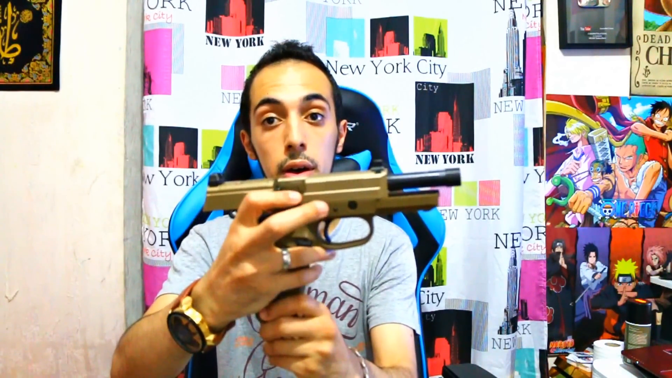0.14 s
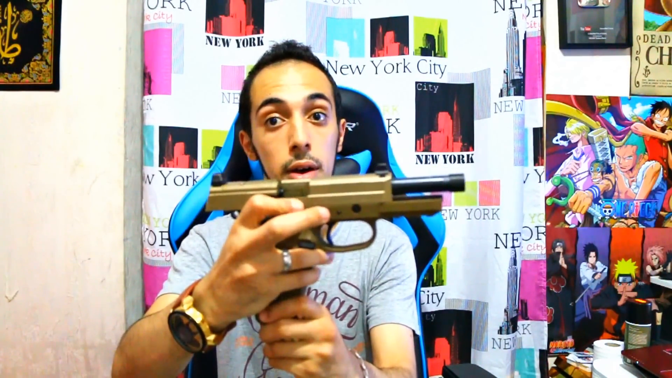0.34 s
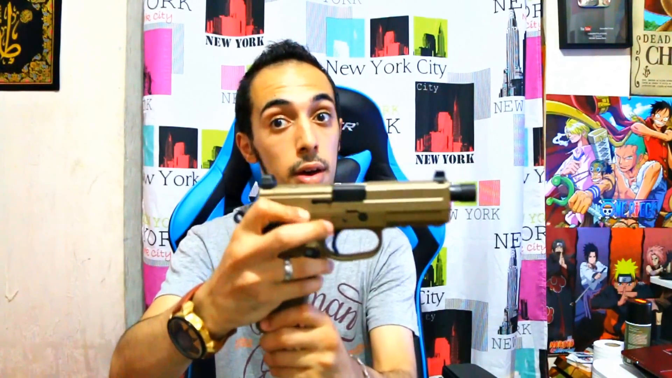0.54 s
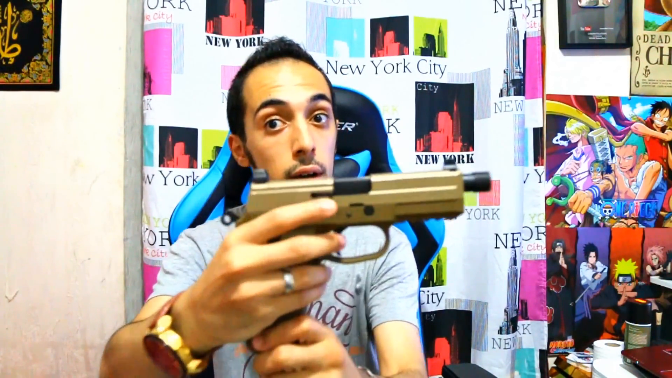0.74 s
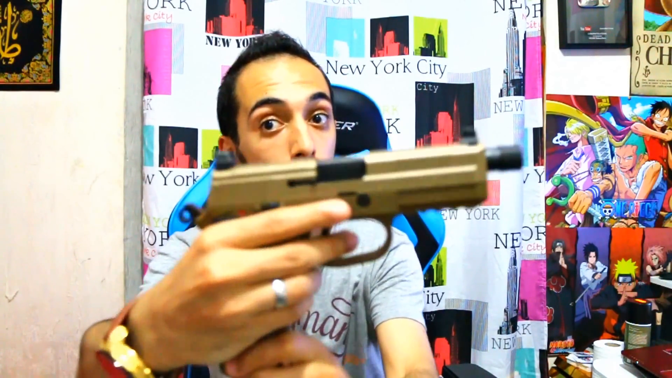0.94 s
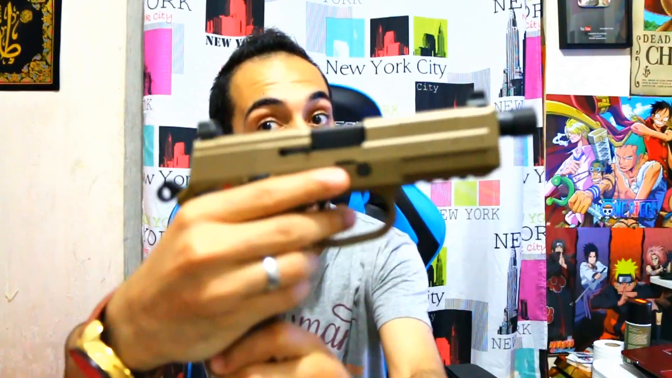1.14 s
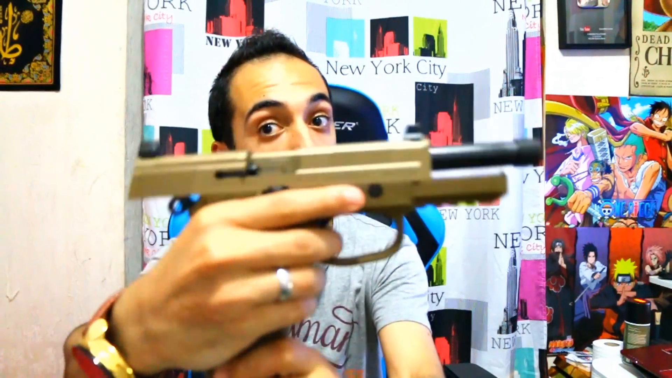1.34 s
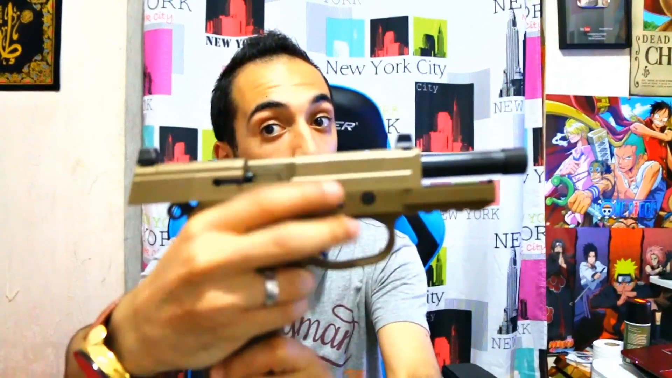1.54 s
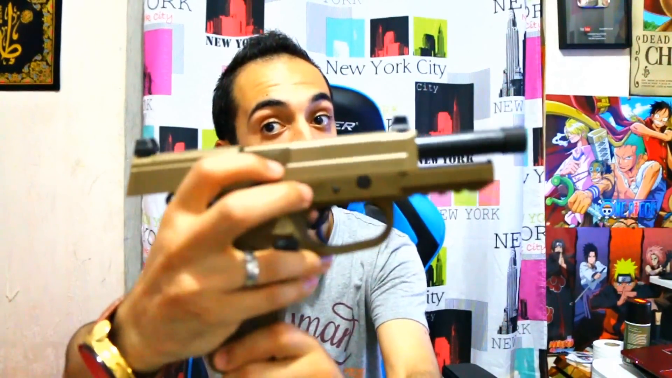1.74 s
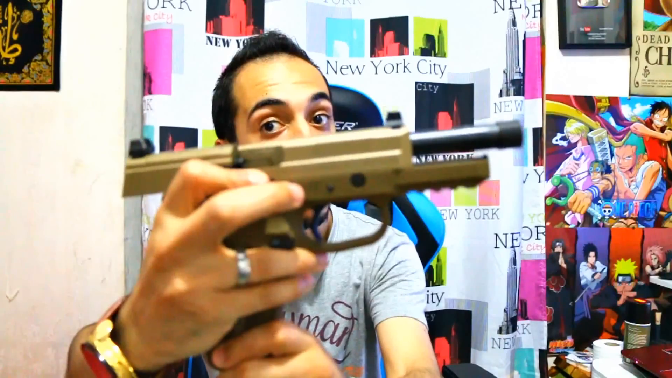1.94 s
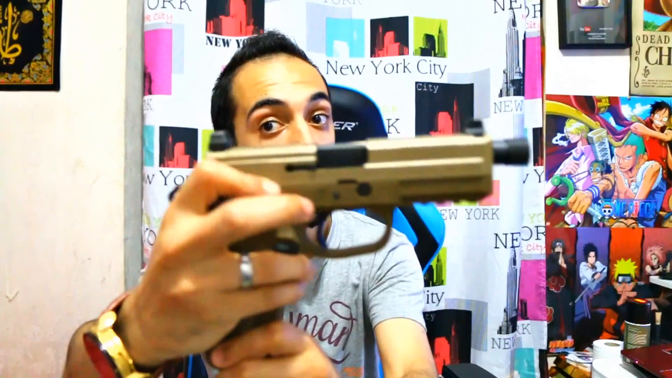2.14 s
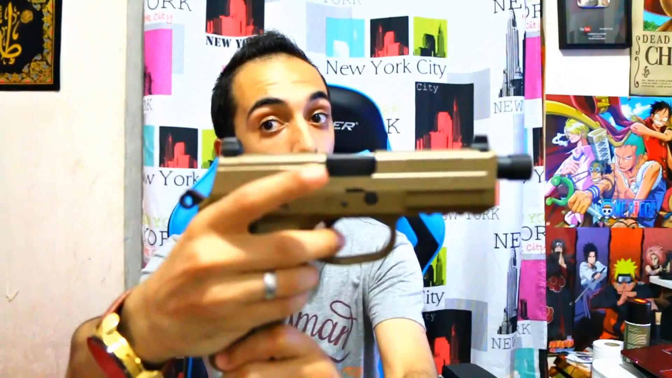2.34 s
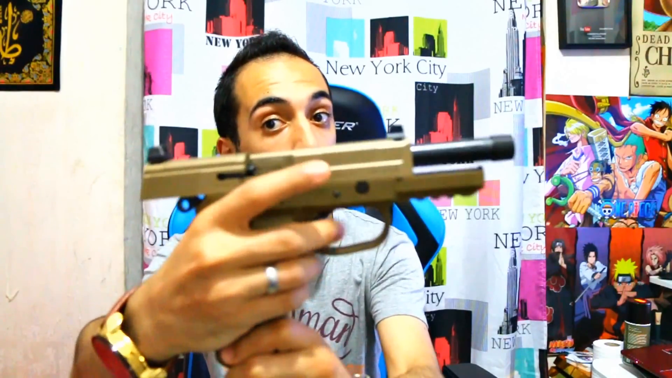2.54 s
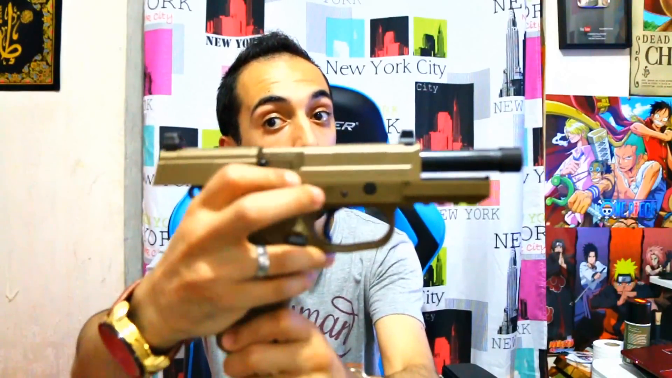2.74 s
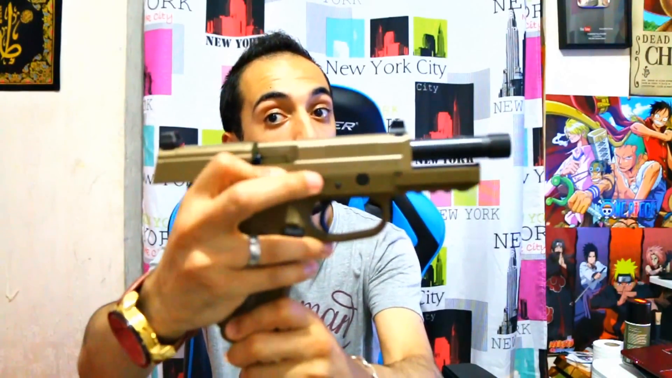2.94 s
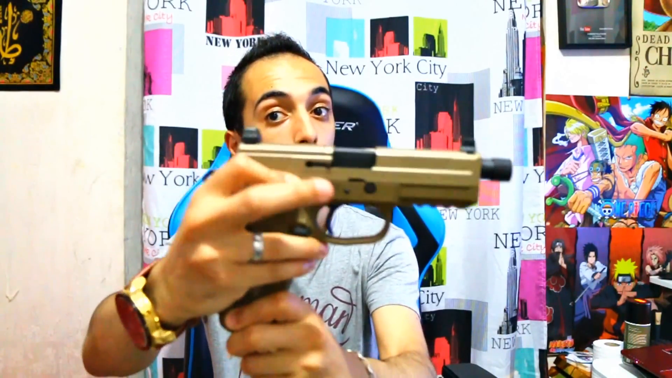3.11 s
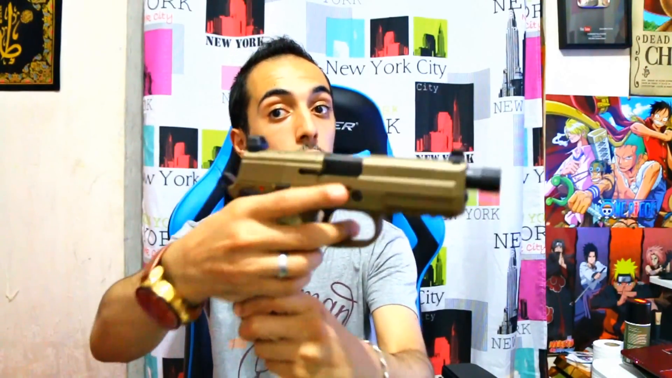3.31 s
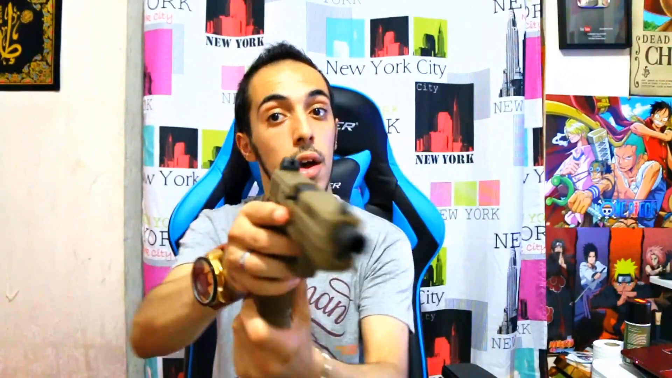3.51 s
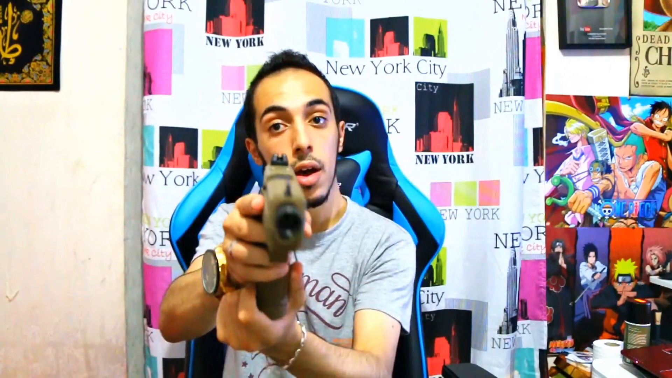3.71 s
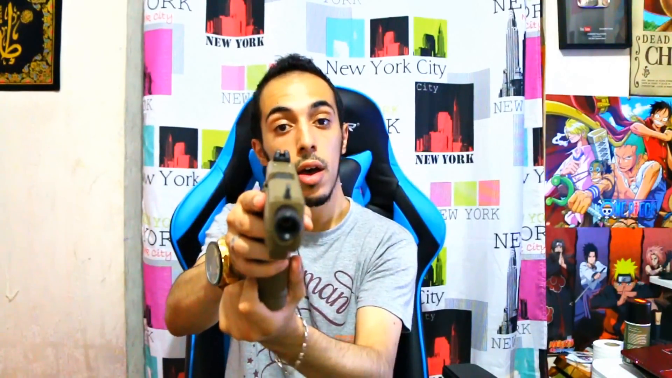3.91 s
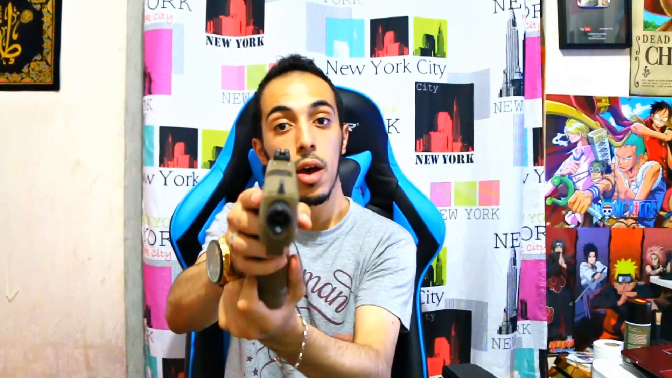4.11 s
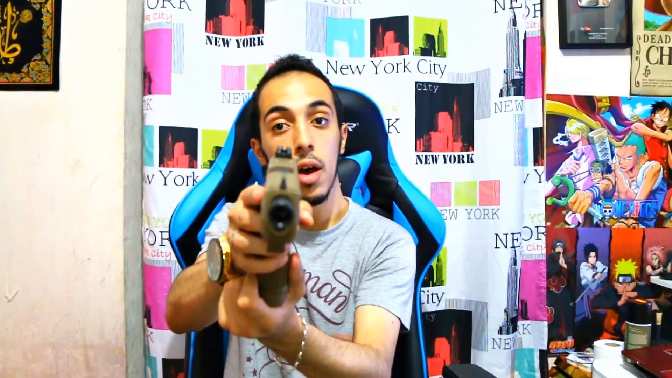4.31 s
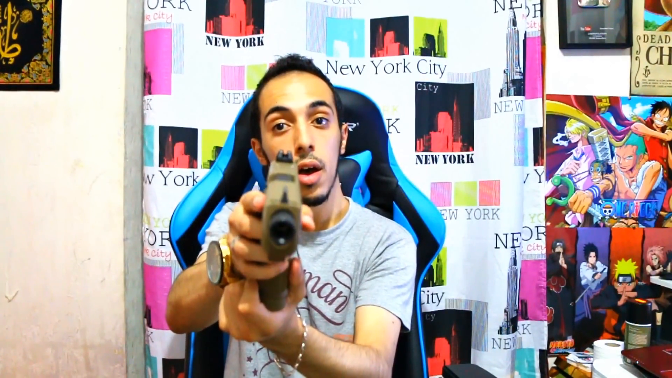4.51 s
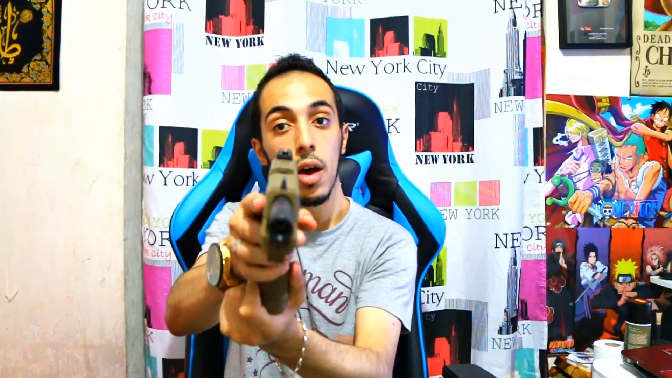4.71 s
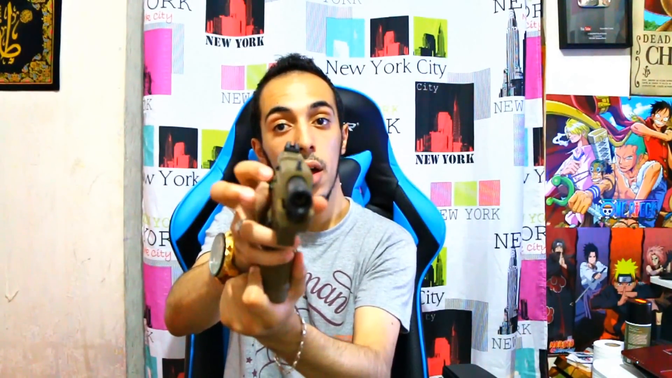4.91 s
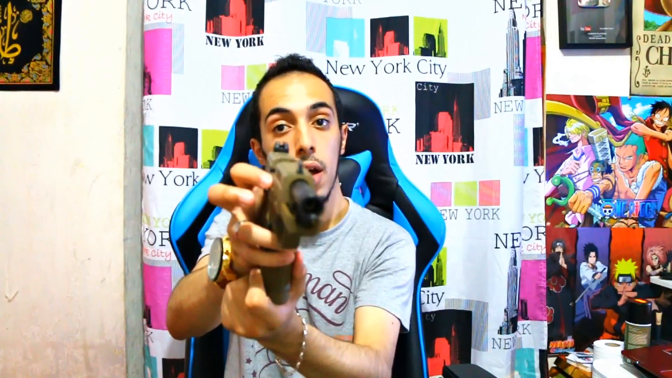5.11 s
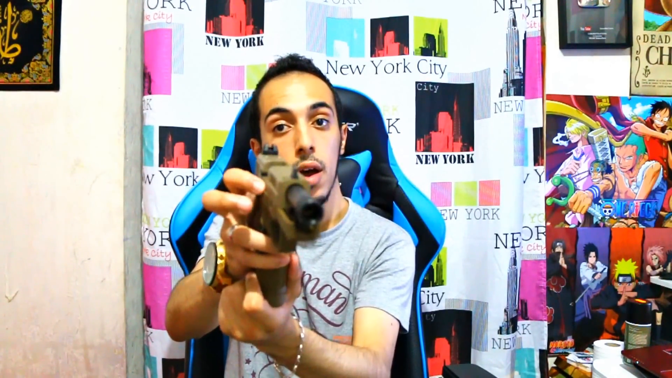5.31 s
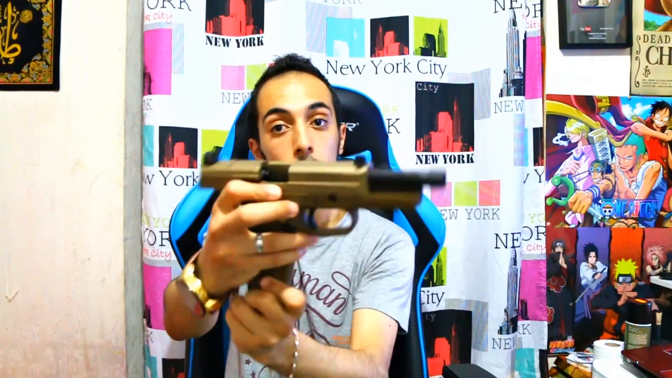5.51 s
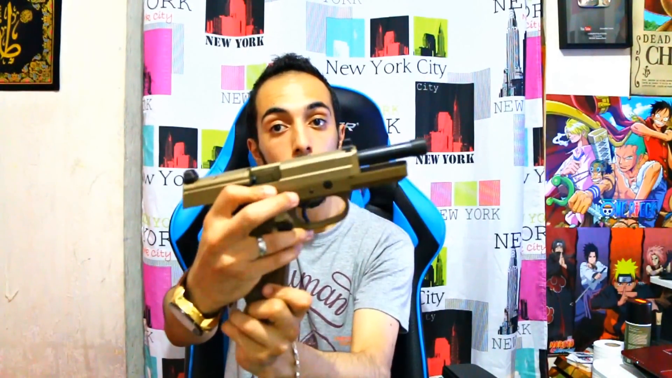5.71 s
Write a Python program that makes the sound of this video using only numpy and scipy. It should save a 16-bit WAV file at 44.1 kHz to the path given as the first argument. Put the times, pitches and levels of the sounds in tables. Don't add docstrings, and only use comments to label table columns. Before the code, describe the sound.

Close to a small microphone in a furnished room, a gas pistol's slide rattles forward and slams shut with a bright metallic crack. A trigger clicks and a rough gas burst overloads the recording. Slam and shot repeat, then a third, softer slam. Quiet finger ticks, rubbing and a low desk knock follow, before one last loud shot and faint handling. Steady faint mains hum and hiss lie underneath.

```python
import sys
import numpy as np
from scipy import signal
from scipy.fft import rfft, irfft
from scipy.io import wavfile
from scipy.ndimage import uniform_filter1d

SR = 44100
rng = np.random.default_rng(int(sys.argv[2]) if len(sys.argv) > 2 else 0)


def output_pcm(signal):
    pcm = np.clip(np.atleast_2d(signal).T, -1, 1) * 32767
    wavfile.write(sys.argv[1], SR, np.round(pcm).astype(np.int16))


def boost(x):
    u = np.asarray(x, float) / 20
    return 10 ** u


N = 253573

# f/Hz, time to fade by 60 dB/s
FRAME_MODES = [(1500, .009), (1880, .009)]
# f/Hz, time to fade by 60 dB/s
GRIP_MODES = [(880, 0.0068), (1120, .009)]
# t/s, level/dB, delay of the second blow/s, frame level/dB
SLAM_EVENTS = [
    (0.5538, 4.5, .0042, -7.5),
    (2.1868, 6, 0.0046, -12),
    (3.130, 3, 0.0051, -7.5),
]
# t/s, gas level/dB, time the valve stays open/s
SHOT_EVENTS = [
    (1.4232, 12, .02),
    (2.5058, 9, 0.029),
    (4.7233, 11, 0.02),
]


def unit(x):
    return x / np.abs(x).max()


def colour(x, points):
    hz, db = np.transpose(points)
    f = np.maximum(np.fft.rfftfreq(len(x), 1 / SR), 1)
    gain = boost(np.interp(np.log(f), np.log(hz), db))
    y = irfft(rfft(x) * gain, len(x))
    return y / y.std()


def ring(x, hz, t60):
    pole = np.exp(2j * np.pi * hz / SR - np.log(1000) / (t60 * SR))
    return signal.lfilter([1], [1, -pole], x).imag


def add(out, s, x):
    i = int(s * SR)
    out[i:i + len(x)] += x[:N - i]


def burst(rise, hold, fall, size=8192):
    t = np.arange(size) / SR
    return np.minimum(t / rise, 1) * np.exp(-np.maximum(t - hold, 0) / fall)


def slide_ring(swell):
    # f/Hz, half width/Hz, level/dB, time to fade by 60 dB/s
    crowds = [(1170, 78, -17, 0.11), (1750, 450, -13, 0.15), (2430, 500, -11, 0.1), (3350, 210, -6.5, 0.22),
              (3880, 400, -11.5, 0.2), (4840, 600, -17, 0.17), (6497, 400, -13.5, 0.13),
              (9200, 7600, -11.5, 0.073)]
    size = 16384
    f, t = np.fft.rfftfreq(size, 1 / SR), np.arange(size) / SR
    metal = 0
    for (hz, spread, db, t60), noise in zip(crowds, rng.standard_normal((len(crowds), size))):
        resonance = f / hz / (1 + ((f - hz) / spread) ** 2)
        crowd = irfft(rfft(noise) * resonance)
        metal = metal + boost(db) * crowd / crowd.std() * 1000 ** (-t / t60)
    return metal * np.minimum(t / swell, 1) / 2


def slams():
    # f/Hz, level/dB
    crack_spectrum = [(300, -41.5), (800, -18.5), (1500, -2), (3300, 1), (4800, -11), (6500, -5),
                      (9000, -9.5), (15000, -16)]
    out = np.zeros(N)
    bass_cut = signal.butter(4, 950, "high", fs=SR, output="sos")
    for s, db, rebound, frame_db in SLAM_EVENTS:
        noise = rng.standard_normal((2, 8192))
        first = burst(.0002, .0012, .002)
        second = np.roll(burst(.0003, .0015, .001), int(rebound * SR))
        crack = .5 * colour(noise[0], crack_spectrum) * (first + 0.26 * second)
        blow = noise[1] * (0.14 * first + second)
        frame = sum(ring(blow, hz, t60) for hz, t60 in FRAME_MODES + GRIP_MODES[1:])
        frame = boost(frame_db) * unit(signal.sosfilt(bass_cut, frame))
        push = np.minimum(np.arange(8192) / (4.2 * rebound * SR), 1)
        thud = boost(-39.5) * np.sin(np.pi * push) ** 2
        grip_thump = boost(-26.5) * unit(ring(second, 450, 0.021))
        add(out, s, boost(db) * (crack + frame - thud + grip_thump))
        add(out, s, boost(db - 6) * slide_ring(swell=.001))
    return out


def shots():
    # f/Hz, level/dB
    gas_spectrum = [(60, -29), (300, -4), (720, -8.5), (1200, -1.5), (3500, 0), (5000, -11), (11000, -16.5),
                    (16000, -19)]
    # f/Hz, level/dB, time to fade by 60 dB/s
    pop_modes = [(218, -1, 0.057), (450, 0.5, .05), (1073, 1.5, .14)]
    out = np.zeros(N)
    for s, db, hold in SHOT_EVENTS:
        noise = rng.standard_normal((2, 8192))
        sputter = boost(2.5 * 10 * uniform_filter1d(noise[1], size=100))
        gas = 0.47 * colour(noise[0] * sputter, gas_spectrum)
        gas = gas * burst(0.00098, hold, 0.0034) * burst(.0001, 0, 0.043)
        kickback = np.roll(burst(0.0002, 0.00047, 0.0001), int(.008 * SR))
        kicks = burst(0.001, 0.0004, 0.00046) - 0.12 * kickback
        pop = unit(sum(boost(level) * unit(ring(kicks, hz, t60)) for hz, level, t60 in pop_modes))
        pop = pop * burst(.0002, hold, 0.0041)
        draught = burst(0.00084, hold, .002)
        add(out, s, boost(db) * (gas + boost(-8) * (pop - 0.15 * draught)))
        add(out, s, boost(db - 9) * slide_ring(swell=0.0042))
    return out


def after_ring():
    # f/Hz, level/dB, time to fade by 60 dB/s
    modes = [(135, -40.5, 0.33), (200, -28.5, 0.28), (336, -49, 0.18), (494, -46.5, 0.9),
             (1000, -43.5, 0.13), (1510, -43.5, 0.27), (2030, -65, .6)]
    out = np.zeros(N)
    kicks = np.zeros(N)
    kicks[[int((s + .01) * SR) for s, *_ in SHOT_EVENTS]] = 1
    for hz, db, t60 in modes:
        waver = 1 + 9 * uniform_filter1d(rng.standard_normal(N), size=900)
        out += boost(db) * waver * ring(kicks, hz, t60)
    return out


def contacts(table):
    # f/Hz, time to fade by 60 dB/s
    slide_modes = [(2750, .003), (3400, .007), (3780, .006)]
    out = np.zeros(N)
    high_pass = signal.butter(2, 4200, "high", fs=SR, output="sos")
    for (s, db, *rel_db), noise in zip(table, rng.standard_normal((len(table), 2048))):
        scrape = noise * burst(.00005, .0002, .00012, size=2048)
        place = 1 + 0.02 * np.tanh(noise[-1])
        parts = []
        for modes in (FRAME_MODES, GRIP_MODES, slide_modes):
            parts.append(sum(ring(ring(scrape, hz * place, t60 / 2), hz * place, t60) for hz, t60 in modes))
        parts.append(signal.sosfilt(high_pass, noise) * burst(.0002, .0006, .0016, size=2048))
        tick = sum(boost(db + part_db) * unit(part) for part_db, part in zip([0] + rel_db, parts))
        add(out, s - .0009, tick)
    return signal.sosfilt(signal.butter(4, 800, "high", fs=SR, output="sos"), out)


def mixed(table, mix_db, scatter_db=0.):
    chances = rng.standard_normal((len(table), 3))
    return [(s, db, *(mix_db + scatter_db * chance)) for (s, db), chance in zip(table, chances)]


def rubbing(table, spectrum, edge, grain_db):
    out = np.zeros(N)
    for s, length, db in table:
        noise = rng.standard_normal((2, 16384))
        grain = boost(grain_db * 10 * uniform_filter1d(noise[1], size=100))
        drag = colour(noise[0] * grain, spectrum) * burst(edge, length, edge, size=16384)
        add(out, s, boost(db) * drag)
    return out


def slide_travel():
    # t/s, level/dB, extra level of the catch bouncing back/dB
    releases = [
        (.505, -1, -9),
        (2.138, 0, 7),
        (3.0784, -0.5, 1.5),
    ]
    # share of travel time, frame level/dB, then grip, slide, edge against it/dB
    stations = [(0, -24, -32, -4, -11.5), (.07, -23, -29.5, 3, 1.5), (.27, -29.5, -13, 7, -5.5),
                (.345, -25.5, -11, 6, -6.5), (.41, -27, -9.5, 3, 3), (.64, -28.5, -14.5, -2, 7),
                (.78, -26, -18.5, -3.5, -1), (.855, -22.5, -12, -0.5, 11.5), (.915, -18, -1, -9.5, -9)]
    # f/Hz, level/dB
    rail_spectrum = [(300, -40.5), (800, -15), (1700, 3), (2500, -3), (3400, -3), (5000, -15.5),
                     (15000, -24)]
    touches, rails = [], []
    for (start, db, bounce_db), (end, *_) in zip(releases, SLAM_EVENTS):
        travel = end - start
        for k, (share, touch_db, *mix) in enumerate(stations):
            catch_db = bounce_db if k == 1 else 0
            touches.append((start + share * travel, db + touch_db + catch_db, *mix))
        rails.append((start, travel, db - 30))
    return contacts(touches) + rubbing(rails, rail_spectrum, edge=0.0016, grain_db=5)


def trigger():
    # t/s, level/dB
    sear = [
        (.484, -55),
        (1.3766, -54),
        (1.4015, -25),
        (2.4722, -47),
        (2.479, -27.5),
        (4.6958, -31.5),
    ]
    # t/s, level/dB
    hammer = [
        (1.4157, -32.5),
        (1.4189, -32),
        (2.4965, -28.5),
        (4.715, -28),
        (4.7169, -21.5),
    ]
    # t/s, level/dB
    latch = [
        (1.589, -21),
        (2.324, -37),
        (2.6469, -20),
        (4.836, -42),
    ]
    # grip, slide, sharp edge against the frame/dB
    sear_mix = (-26.5, -8.5, -24.5)
    hammer_mix = (-16, 0, -10)
    latch_mix = (-21, 0, 2.5)
    return contacts(mixed(sear, sear_mix) + mixed(hammer, hammer_mix) + mixed(latch, latch_mix))


def handling():
    # t/s, level/dB
    fingers = [(1.11, -64), (3.035, -55), (3.554, -49), (3.562, -46), (3.6, -62), (3.632, -57.5),
               (3.665, -40), (3.701, -47), (3.99, -62), (5.49, -61)]
    # t/s, level/dB
    palm = [(.8, -68), (1.03, -67), (2.96, -63), (3.639, -49), (3.74, -59), (3.835, -58), (4.05, -65),
            (4.098, -57), (5.58, -51)]
    # t/s, length/s, level/dB
    rustle = [(.78, 0.046, -66.5), (1.0, 0.11, -75), (2.93, 0.091, -71), (3.55, 0.031, -62.5),
              (3.62, 0.12, -70), (3.82, 0.023, -72), (3.97, 0.073, -73.5), (4.09, 0.03, -65.5),
              (5.45, 0.056, -74.5), (5.57, 0.023, -63.5)]
    # f/Hz, level/dB
    skin_spectrum = [(150, -13), (400, 11.5), (1000, -0.5), (1900, -2), (3600, -11), (5000, -15),
                     (15000, -37)]
    # grip, slide, sharp edge against the frame/dB
    finger_mix = (-10, -10, -20)
    palm_mix = (1, -7, -20)
    taps = mixed(fingers, finger_mix, scatter_db=2.5) + mixed(palm, palm_mix, scatter_db=2.5)
    return contacts(taps) + rubbing(rustle, skin_spectrum, edge=0.0099, grain_db=7)


def crackle():
    # t/s, level/dB, length/s
    ticks = [(3.450, -72, .001), (3.527, -64, .001), (3.597, -69.5, .001), (3.632, -74.5, .001),
             (3.842, -80, 0.0054), (3.864, -63.5, .007), (3.894, -61, .009), (3.912, -73.5, .02)]
    out = np.zeros(N)
    for s, db, length in ticks:
        add(out, s, boost(db) * rng.standard_normal(2048) * burst(.0006, length, .002, size=2048))
    return signal.sosfilt(signal.butter(5, 11000, "high", fs=SR, output="sos"), out)


def knocks():
    # t/s, level/dB, f/Hz, time to fade by 60 dB/s
    bumps = [
        (.797, -65, 296, 0.015),
        (3.400, -45, 200, 0.0084),
        (3.632, -57, 200, 0.059),
        (3.664, -75, 450, 0.042),
    ]
    out, t = np.zeros(N), np.arange(8192) / SR
    for s, db, hz, t60 in bumps:
        push = np.sin(2 * np.pi * hz * (1.2 - 5 * t) * t) * burst(.002, .03, .006)
        sag = np.sin(2 * np.pi * 0.4 * hz * t) * burst(.01, 0.024, 0.043)
        add(out, s, boost(db) * (unit(ring(push, hz, t60)) + 0.23 * sag))
    return out


def room(x):
    # f/Hz, time to fade by 60 dB/s
    fading = [(100, 0.092), (300, 0.2), (1000, 0.2), (3000, 0.23), (6000, 0.25), (14000, 0.19)]
    hz_table, t60_table = np.transpose(fading)
    t, echo = np.arange(SR // 2) / SR, 0
    for hz in 60 * 2 ** np.arange(0, 8.2, .5):
        t60 = np.interp(np.log(hz), np.log(hz_table), t60_table)
        band = signal.butter(2, [hz / 2 ** .25, hz * 2 ** .25], "band", fs=SR, output="sos")
        early = 1000 ** (-t / t60)
        late = boost(-21) / (1 + (hz / 4000) ** 2) * 1000 ** (-t / (2.0 * t60))
        echo = echo + signal.sosfilt(band, rng.standard_normal(len(t))) * (early + late)
    echo = echo * np.clip((t - .002) / 0.003, 0, 1)
    return signal.fftconvolve(x, echo / np.sqrt(np.sum(echo ** 2)))[:N]


def hum_and_hiss():
    # f/Hz, rms level/dB
    hum = [(102.3, -81.5), (150.7, -75.5), (199.2, -73.5), (247.6, -90.5), (301.5, -80.5), (344.5, -90),
           (398.4, -85.5), (500.6, -76.5), (1233, -94.5), (1427, -90.5), (2019, -97)]
    # f/Hz, level/dB
    hiss_spectrum = [(30, -10), (200, -7), (500, -14), (1400, -13.5), (2200, -19), (3700, -17),
                     (5200, -27.5), (16000, -33)]
    t = np.arange(N) / SR
    out = boost(-73.5) * colour(rng.standard_normal(N), hiss_spectrum)
    for (hz, db), chance in zip(hum, rng.standard_normal((len(hum), 2, 128))):
        sway, turn = (np.interp(t, np.linspace(0, t[-1], 128), c) for c in chance)
        out += np.sqrt(2) * boost(db + 1.5 * sway) * np.sin(2 * np.pi * hz * t + .6 * turn)
    return out


def scene():
    slam, shot, hands = slams(), shots(), handling()
    small_parts = slide_travel() + trigger()
    wet = room(boost(-13) * slam + boost(-9) * shot + boost(-11.5) * small_parts + boost(-8.0) * hands)
    near = slam + shot + small_parts + hands + crackle()
    return (near + knocks() + after_ring() + wet + hum_and_hiss())[None]


def band_limit(x):
    return signal.sosfilt(signal.butter(12, 16140, fs=SR, output="sos"), x)


def record(dry):
    flattened = np.clip(dry, -.97, .97)
    return band_limit(flattened)


dry = scene()
out = record(dry)
output_pcm(out)
```